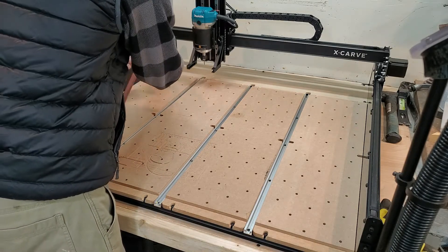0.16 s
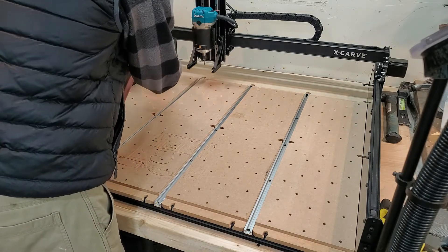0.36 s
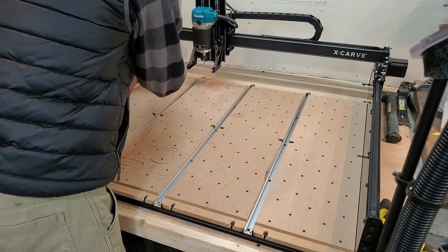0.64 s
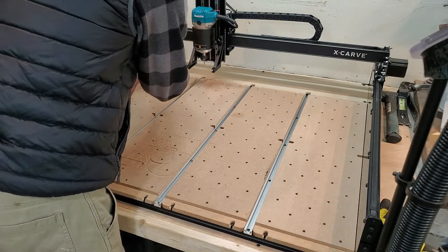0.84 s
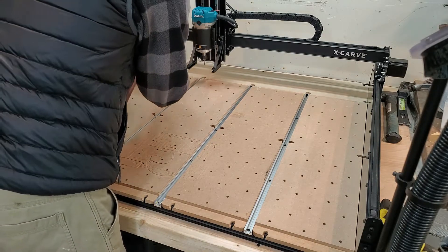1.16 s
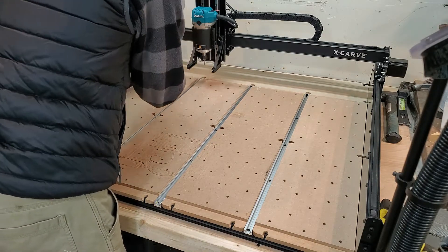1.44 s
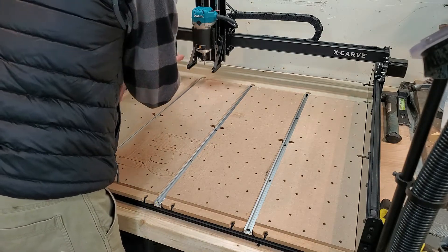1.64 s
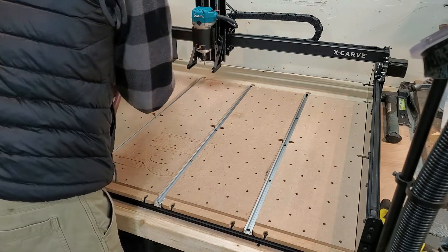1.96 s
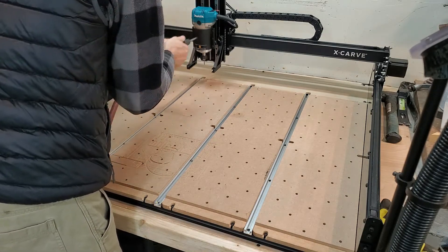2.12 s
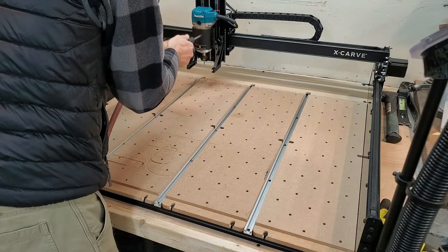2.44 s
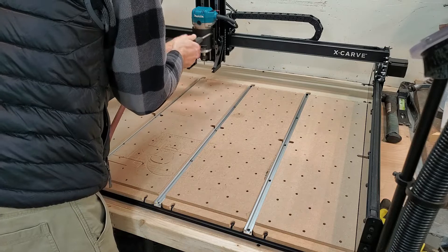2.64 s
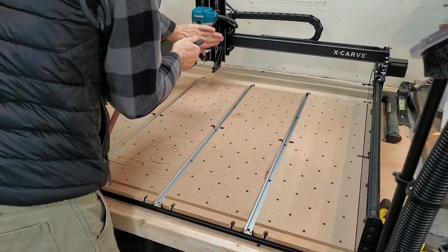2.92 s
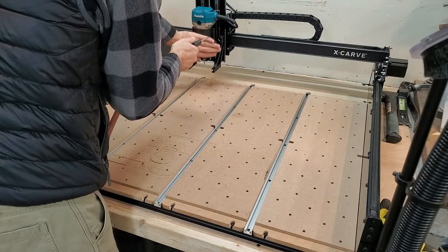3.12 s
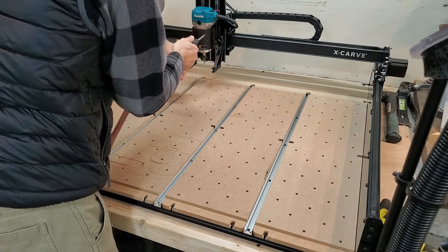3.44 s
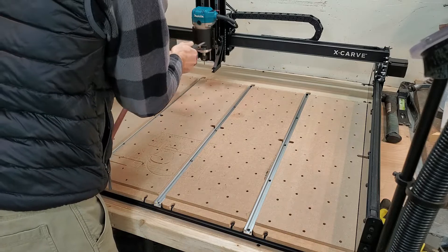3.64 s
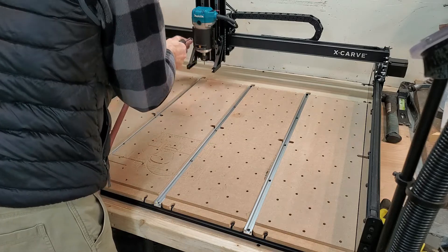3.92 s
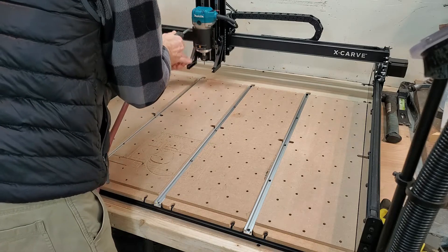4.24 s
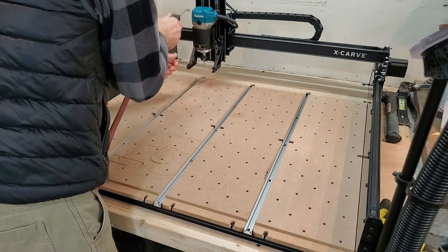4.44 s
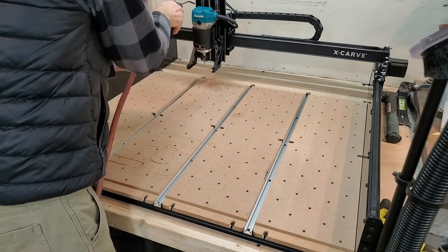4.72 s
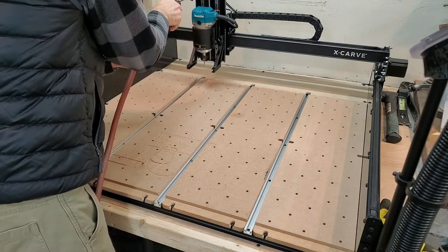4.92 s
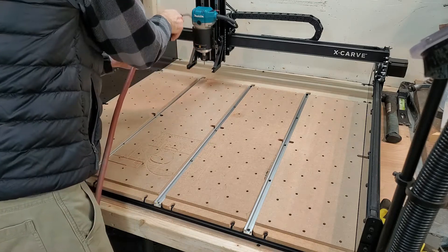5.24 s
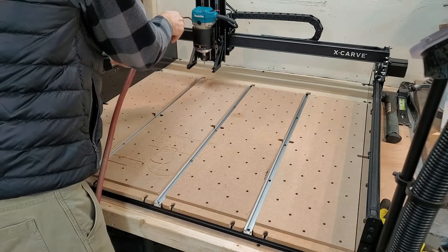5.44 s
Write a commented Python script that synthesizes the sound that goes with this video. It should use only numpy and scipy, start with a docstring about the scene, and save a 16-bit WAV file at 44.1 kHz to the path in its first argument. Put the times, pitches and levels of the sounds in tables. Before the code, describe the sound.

Sharp, bright air-gun blasts spray over a machine: long, many short, then long again, with an early bench rattle and faint dull knocks.

```python
"""A long blast of a compressed-air blow gun, already blowing at the start, then nine short bursts and a last blast.
The jet is shaped noise: a hiss at the nozzle, a splash on metal, a roar in hollows, combed by swaying echoes.
During the first blast the bench takes one rattling bump: half-sine blows ring its modes and shake noisy loose parts.
Clothing rustles as soft swells of noise, a few dull knocks ring the frame, and a cavity hoots under the later jets.
A faint low rumble of the workshop lies beneath it all."""
import sys
import numpy as np
from scipy import signal
from scipy.fft import irfft, next_fast_len
from scipy.io import wavfile
from scipy.ndimage import uniform_filter1d, map_coordinates

SR = 44100
rng = np.random.default_rng(int(sys.argv[2]) if len(sys.argv) > 2 else 0)


def to_wav(sig):
    """Store sig (one row per channel, or 1-D mono) as 16-bit WAV at the path in sys.argv[1].

    Samples outside -1..1 are clipped; the rate is SR.
    """
    pcm = np.clip(np.atleast_2d(sig), -1, 1) * 32767
    pcm = np.round(pcm).astype(np.int16)
    wavfile.write(sys.argv[1], SR, pcm.T)  # frames by channels


N = 245637


def undb(db):
    """Turn decibels into a gain."""
    return 10 ** (np.asarray(db) / 20)


def unit(x):
    """Scale to an average strength (rms) of 1."""
    return x / np.sqrt(np.mean(x ** 2))


def clock():
    """Time of every sample, in seconds."""
    return np.arange(N) / SR


def bins():
    """Frequency of every bin of a spectrum, in Hz."""
    return np.arange(N // 2 + 1) * SR / N


def decay(age, t60):
    """Die away by 60 dB in t60 seconds."""
    return np.exp(-np.log(1000) * age / t60)


def contour(points):
    """Join (Hz, dB) points into a spectrum, on a logarithmic frequency axis."""
    hz, db = np.transpose(points)
    return np.interp(np.log(bins() + 1), np.log(hz), db)


def bumps(peaks):
    """One bell-shaped bump of height 1 per resonance, each with its dB value: (bump, dB)."""
    return [(1 / (1 + (2 * (bins() - hz) / width) ** 2), db) for hz, width, db in peaks]


def lifts(peaks):
    """Resonances raise the spectrum around their own frequency; gives the lift in dB."""
    return sum(db * bump_shape for bump_shape, db in bumps(peaks))


# The body shades the right side: (frequency [Hz], left minus right [dB])
BODY_SHADE = [(60, 0), (400, 1.5), (1300, 2.5), (2400, 3.5), (4400, 6.5), (6300, 7), (8200, 5),
              (11000, 2.5), (15000, 2)]


def noise(db, alike_hz=800):
    """Stereo noise with the given spectrum; the two sides agree only at long wavelengths."""
    mid, side = rng.standard_normal((2, N // 2 + 1)) + 1j * rng.standard_normal((2, N // 2 + 1))
    alike = .9 / (1 + (bins() / alike_hz) ** 4)
    signs = np.array([[1], [-1]])  # left, right
    both = mid * np.sqrt(1 + alike) + signs * side * np.sqrt(1 - alike)
    level_db = db + signs * contour(BODY_SHADE) / 2
    return unit(irfft(both * undb(level_db), N))


def walk(rate):
    """Smooth random wandering with spread 1, changing about rate times a second."""
    step = max(int(SR / rate), 2)
    stairs = np.repeat(rng.standard_normal(N // step + 1), step)
    smooth = uniform_filter1d(uniform_filter1d(stairs, step), step)
    return unit(smooth[:N])


def swell(s, rise, fall):
    """A smooth bell that peaks at s; rise and fall set its spread in seconds on each side."""
    age = clock() - s
    return np.exp(-.5 * (age / np.where(age < 0, rise, fall)) ** 2)


def fading(blows, attack, t60):
    """Blows (s, dB) whose energies add up and die away, as a loudness curve."""
    t, power = clock(), 0
    for s, db in blows:
        age = np.maximum(t - s, 0)
        strength = undb(db) * (1 - np.exp(-age / attack)) * decay(age, t60)
        power = power + strength ** 2
    return np.sqrt(power)


def ring(blows, modes, build_s):
    """Blows (s, dB, contact s) push as half sines on damped modes; a long contact rings only the low ones."""
    push, t = np.zeros(N), clock()
    for s, db, contact in blows:
        pulse = np.sin(np.pi * np.clip((t - s) / contact, 0, 1))
        push += undb(db) * pulse / max(pulse.sum(), 1)
    t = t[:SR]
    body = sum(undb(db) * decay(t, t60) * np.sin(2 * np.pi * hz * t) for hz, db, t60 in modes)
    # the vibration takes a moment to spread over the whole body
    body = body * (1 - np.exp(-t / build_s))
    return signal.fftconvolve(push, body)[:N]


def room(x, wet_db, t60_low=0.27, t60_high=.19):
    """The room adds a short, blurred tail that loses its treble first."""
    t = clock()[:SR // 2]
    grain = rng.standard_normal((2, len(t)))
    low = signal.sosfilt(signal.butter(2, 2500, fs=SR, output="sos"), grain)
    high = grain - low
    tail = low * decay(t, t60_low) + high * decay(t, t60_high)
    tail *= t > .004  # the tail starts after 4 ms
    tail /= np.sqrt(np.sum(tail ** 2, axis=1, keepdims=True))
    wet = undb(wet_db)
    echo = signal.fftconvolve(np.atleast_2d(x), tail, axes=1)[:, :N]
    return (x + wet * echo) / np.hypot(1, wet)


def standing(x, angle):
    """Low sound stands in the room, so the left side lags the right by a phase angle in radians."""
    analytic = signal.hilbert(x, next_fast_len(N))[:, :N]
    return np.real(analytic * np.exp(.5j * angle * np.array([[-1], [1]])))


# Trigger pulls, each aimed at a new spot; levels are before the final mix of the jet:
# (valve starts to open [s], opening time [s], release [s], time for the flow to die by 60 dB [s],
#  nozzle hiss [dB], splash on metal [dB], hollows [dB], roar on the board [dB])
TRIGGER_PULLS = [(-.06, .027, .987, .19, -26.7, -35, -47.5, -53.5),
                 (1.261, .048, 1.386, .16, -26.3, -35.3, -49.5, -61),
                 (1.463, .039, 1.578, .17, -24.6, -32.5, -44.5, -53.5),
                 (1.668, .032, 1.784, .2, -20.7, -28.3, -45, -55.5),
                 (1.907, .036, 2.054, .19, -26.9, -35.7, -47.3, -57),
                 (2.256, .033, 2.381, .154, -23.6, -35.3, -43.5, -61.5),
                 (2.469, .04, 2.592, .15, -23.8, -33.5, -45, -58.5),
                 (3.469, .064, 3.568, .135, -24, -33.3, -44, -58),
                 (3.639, .039, 3.822, .225, -23.9, -33.7, -44.5, -58.5),
                 (4.14, .046, 4.26, .16, -23, -33.2, -40, -56),
                 (4.746, .041, 5.442, .27, -24.3, -31.8, -39.5, -63.5)]
SAG_DB_PER_S = 4.3  # the hose loses pressure, so the flow sinks during a pull


def valve(curve=2.75, crack=0.09, crack_s=0.0069):
    """Air flow of each pull: the seal cracks, the valve opens, the hose sags, then the pressure bleeds away."""
    t, flows = clock(), []
    for start, opening, release, closing, *_ in TRIGGER_PULLS:
        age = np.maximum(t - start, 0)
        leak = crack * np.minimum(age / crack_s, 1) ** 2
        opened = np.sin(np.pi / 2 * np.minimum(age / opening, 1)) ** curve
        sag = undb(-SAG_DB_PER_S * age)
        bleed = decay(np.maximum(t - release, 0), closing)
        flows.append(np.maximum(leak, opened) * sag * bleed)
    return np.array(flows)


# Echoes off the board, gantry and wall, before random shifts: (delay [ms], level [dB])
NEAR_SURFACES = [(.45, -3), (1.3, -6.5), (2.9, -4.5), (5.2, -6.5), (8.5, -10)]


def reflect(x, sway_ms=.055, sway_rate=2.5, move_ms=0.1586):
    """Close echoes comb the hiss; the gun sways during a pull and is held somewhere new for the next."""
    out, index = x.copy(), np.arange(N)
    pull = np.searchsorted([row[0] for row in TRIGGER_PULLS], clock())
    for side in range(2):
        fine = signal.resample_poly(x[side], 4, 1)  # four times finer, for delays between samples
        for ms, db in NEAR_SURFACES:
            base = ms * rng.uniform(.75, 1.25)
            place = move_ms * rng.standard_normal(len(TRIGGER_PULLS) + 1)[pull]
            delay = (base + place + sway_ms * walk(sway_rate)) * SR / 1000  # in samples
            echo = map_coordinates(fine, [4 * (index - np.abs(delay))], order=1)
            out[side] += undb(db) * echo
    return out / np.sqrt(1 + sum(undb(db) ** 2 for ms, db in NEAR_SURFACES))


# Spectra of the four parts of the jet: (frequency [Hz], relative level per Hz [dB])
NOZZLE_HISS = [(5000, -32), (7500, -11.5), (9000, -2.5), (10500, -2.5), (12000, -1), (14000, -1.5),
               (15800, -4.5), (17000, -8.5)]
METAL_SPLASH = [(1800, -27.5), (2600, -7.5), (3200, -7.5), (3800, -3.5), (4500, -5), (5200, -0.5),
                (6300, 1), (7300, -4.5), (9000, -12.5), (13000, -36)]
HOLLOW_ROAR = [(500, -28.5), (900, -13), (1150, -8.5), (1550, -0.5), (2000, -4), (2650, 2.5), (3100, -3),
               (4500, -23.5)]
BOARD_ROAR = [(30, -24), (70, -3.5), (130, -11.5), (220, -7.5), (350, -3.5), (480, -0.5), (640, 1.5),
              (900, -4), (1400, -17), (2500, -34.5)]
# Resonances of the nozzle and of the edges in the jet: (frequency [Hz], width [Hz], lift [dB])
JET_EDGES = [(1555, 190, 2), (3850, 500, 1.8), (6280, 280, 1.8), (10070, 300, 2), (11360, 470, 4),
             (12460, 400, 3), (13550, 340, 2.5), (14600, 500, 3.5)]


def air_jet(flows, flutter_db=0.82, own_flutter_db=0.8):
    """Rushing air as four noises; the nozzle hiss needs the most pressure, so it comes last and goes first."""
    flutter, lift_db = flutter_db * walk(60), lifts(JET_EDGES)
    *_, hiss_db, splash_db, hollow_db, roar_db = np.transpose(TRIGGER_PULLS)

    def part(spectrum, level_db, power):
        """One noise, driven by the strongest pull; a higher power needs more pressure."""
        strength = np.max(undb(level_db)[:, None] * flows ** power, axis=0)
        unsteady = undb(flutter + own_flutter_db * walk(30))
        return noise(contour(spectrum) + lift_db) * strength * unsteady

    hiss = part(NOZZLE_HISS, hiss_db, power=1.27)
    splash = part(METAL_SPLASH, splash_db, power=0.78)
    hollow = part(HOLLOW_ROAR, hollow_db, power=0.95)
    roar = part(BOARD_ROAR, roar_db, power=0.88) * undb(-1.77)
    treble = room(reflect(hiss + splash), wet_db=-8.5) * undb(0.44)
    bass = room(hollow + roar, wet_db=-2.5, t60_low=0.22) * undb(-0.75)
    return treble + bass


# Spectrum of the quiet workshop: (frequency [Hz], relative level per Hz [dB])
WORKSHOP_RUMBLE = [(20, -15), (65, 1), (130, -10), (250, -13.5), (600, -25), (2000, -29), (16000, -31)]


def workshop():
    """Steady, faint low noise that stands in the room."""
    return standing(noise(contour(WORKSHOP_RUMBLE)), angle=0.99) * undb(-77.5)


# Blows of the bump against the bench, levels before mixing:
# (time [s], thud level [dB], rattle level [dB], contact time [s])
BUMP_BLOWS = [(.252, -37, -51.5, 0.0081), (0.26, -36.5, -35, 0.0035), (.274, -32, -22.5, .002),
              (.283, -27, -20.5, 0.0029), (.294, -35, -29.5, .003), (.314, -39.5, -22.5, .003),
              (0.326, -43, -29, .003), (0.346, -31.5, -33, 0.011), (0.408, -38.5, -55, .014)]
# Modes (natural tones) of the bench: (frequency [Hz], relative level [dB], time to die by 60 dB [s])
BENCH_MODES = [(55.9, 0, .4), (67, 0.5, 0.19), (89.5, -4.5, 0.16), (149.3, -8, .25), (205, -15, .2),
               (240, -4.5, .25), (295, 0, 0.12), (390, 0, .24), (683, 0.5, .24), (1034, 3.5, .14)]
# Shudder of the bench and the room after any blow: (frequency [Hz], relative level per Hz [dB])
BLOW_SHUDDER = [(20, -25.5), (45, -3), (70, -0.5), (95, -5), (130, -16.5), (220, -20.5), (320, -30),
                (700, -49.5)]
# Spectrum of loose parts on the bench: (frequency [Hz], relative level per Hz [dB])
RATTLE_SPECTRUM = [(60, -11.5), (280, 2.5), (450, -1.5), (800, 0.5), (1200, -4), (1500, -3.5), (2100, -2.5),
                   (2900, 1.5), (4500, -6.5), (7000, -11.5), (11000, -7.5), (16000, -13.5)]
# Ringing of the loose parts: (frequency [Hz], width [Hz], lift [dB])
LOOSE_PARTS = [(710, 80, 6.5), (1050, 80, 9.5), (1460, 112, 8), (1620, 70, 5), (1790, 170, 7)]


def bump():
    """The bench thuds and shudders, and loose parts on it chatter at each blow."""
    thud = ring([(s, db, contact) for s, db, _, contact in BUMP_BLOWS], BENCH_MODES, build_s=0.0027)
    shaking = fading([(s, db) for s, db, _, _ in BUMP_BLOWS], attack=.01, t60=1.3)
    shudder = shaking * noise(contour(BLOW_SHUDDER))
    chatter = fading([(s, db) for s, _, db, _ in BUMP_BLOWS], attack=0.002, t60=0.12)
    uneven = undb(1.8 * walk(500))
    rattle = chatter * noise(contour(RATTLE_SPECTRUM) + lifts(LOOSE_PARTS)) * uneven
    low = standing(thud * undb(2.0) + shudder * undb(-19), angle=1.4)
    return low + room(rattle, wet_db=-7.5, t60_low=.26)


# Strokes of the arm, levels before the crinkle:
# (fastest at [s], rise spread [s], fall spread [s], nylon swish level [dB], sleeve rub level [dB])
ARM_STROKES = [(1.13, .15, .05, -62.8, -65), (1.9, .2, .09, -68, -63), (2.85, .07, .04, -70, -74),
               (2.955, .03, .018, -60.5, -85), (3.09, .034, .04, -61, -80), (3.23, .04, .06, -71, -94),
               (4.56, .09, .09, -63, -62)]
# Spectra of the nylon and of the sleeve: (frequency [Hz], relative level per Hz [dB])
NYLON_SWISH = [(1000, -22.5), (2300, -12), (2800, 1), (3600, -2), (5500, 0), (8000, -6.5), (11000, -0.5),
               (16000, -5.5)]
SLEEVE_RUB = [(60, -9), (150, -11), (350, -6), (580, 1), (900, -6), (1300, -5), (2200, -12.5), (5000, -30)]
STILL_DB = -84  # nylon swish between the strokes, before the crinkle


def clothing(crinkle_db=1.0):
    """A nylon vest swishes and a sleeve rubs, both unevenly, with each stroke of the arm."""
    strokes = sum(undb(db) * swell(s, rise, fall) for s, rise, fall, db, _ in ARM_STROKES)
    nylon = undb(STILL_DB) + strokes
    sleeve = sum(undb(db) * swell(s, rise, fall) for s, rise, fall, _, db in ARM_STROKES)
    swish = noise(contour(NYLON_SWISH)) * nylon * undb(crinkle_db * walk(120))
    rub = noise(contour(SLEEVE_RUB)) * sleeve * undb(crinkle_db * walk(40))
    return swish + rub


# Soft knocks, levels before mixing: (time [s], level [dB], contact time [s])
SOFT_KNOCKS = [(2.845, -59, .008), (2.872, -52, .0056), (2.925, -54.5, .0092), (3.011, -46.5, .008),
               (3.06, -51, .005), (3.084, -48, .0025), (3.117, -42.5, .0068), (3.245, -54.5, .0097),
               (4.29, -62, .0072), (5.06, -58.5, .007), (5.42, -51, .0075), (5.455, -50, .003),
               (5.486, -53, .002), (5.515, -49, .002)]
# Modes of the frame under soft knocks: (frequency [Hz], relative level [dB], time to die by 60 dB [s])
FRAME_MODES = [(58.5, -11.5, 0.16), (77.2, 0.5, 0.27), (98, -13, 0.17), (150, -8, .15), (224.96, -16, 0.27)]


def knocks():
    """Dull knocks ring the frame and leave a short shudder."""
    shaking = fading([(s, db) for s, db, _ in SOFT_KNOCKS], attack=0.0055, t60=0.34)
    shudder = shaking * noise(contour(BLOW_SHUDDER))
    ringing = ring(SOFT_KNOCKS, FRAME_MODES, build_s=0.0087)
    return standing(ringing * undb(4.5) + shudder * undb(-5.5), angle=.5)


# The jet crosses a cavity, levels before the air flow scales them:
# (middle [s], spread to each side [s], hoot level [dB], roar level [dB])
JET_CROSSINGS = [(4.206, .03, -53, -68), (4.863, .058, -38.5, -53), (5.078, .05, -47, -57),
                 (5.345, .035, -52, -54)]
# Resonances of the cavity: (frequency [Hz], width [Hz], relative level [dB])
CAVITY_TONES = [(371, 45, -16), (710, 73, -12), (900, 160, -12.5), (1230, 190, -1.5), (1550, 230, 3)]


def cavity(flows):
    """A hollow of the machine hoots and roars while the jet sweeps over its mouth."""
    hoot = sum(undb(db) * swell(s, half, half) for s, half, db, _ in JET_CROSSINGS)
    roar = sum(undb(db) * swell(s, half, half) for s, half, _, db in JET_CROSSINGS)
    gain = sum(undb(db) * bump_shape for bump_shape, db in bumps(CAVITY_TONES))
    tone = standing(noise(20 * np.log10(gain))[:1], angle=1.5)  # one noise feeds both sides
    mouth = tone * hoot + noise(contour(BOARD_ROAR)) * roar
    return room(mouth * flows.max(axis=0), wet_db=-6)


def scene():
    """Air, bench and clothing over the faint rumble of the workshop."""
    flows = valve()
    return air_jet(flows) + workshop() + bump() + clothing() + knocks() + cavity(flows)


def record(dry, low_hz=36, top_hz=15950):
    """Filters drop the deepest bass and cut the top steeply."""
    lean = signal.sosfilt(signal.butter(4, low_hz, "high", fs=SR, output="sos"), dry)
    return signal.sosfilt(signal.ellip(12, .1, 80, top_hz, fs=SR, output="sos"), lean)


dry = scene()
out = record(dry)
to_wav(out)
```